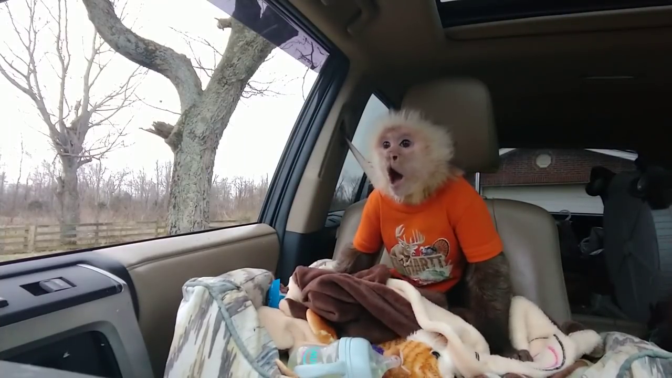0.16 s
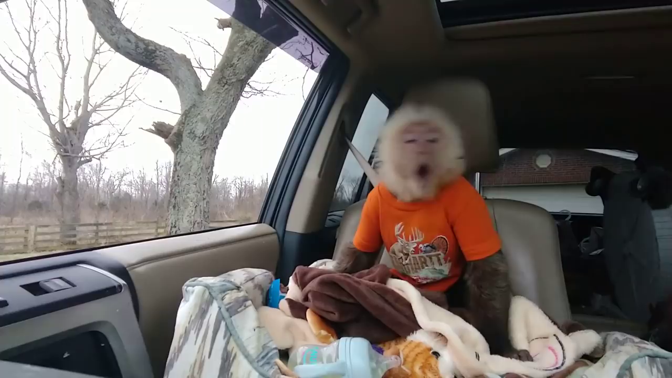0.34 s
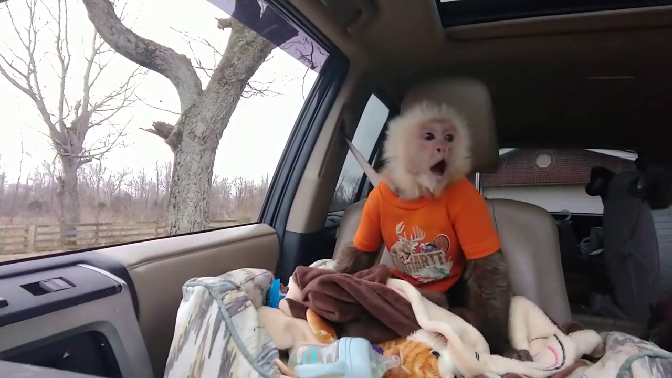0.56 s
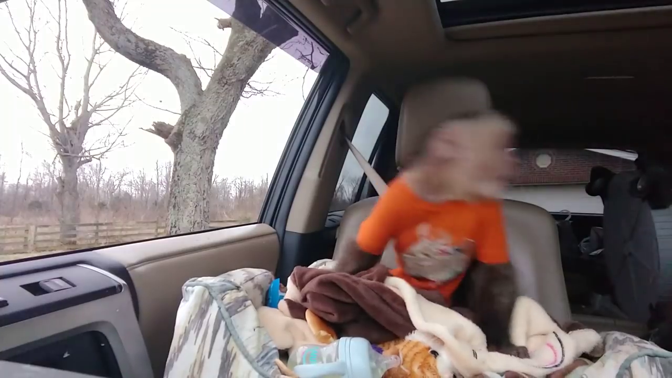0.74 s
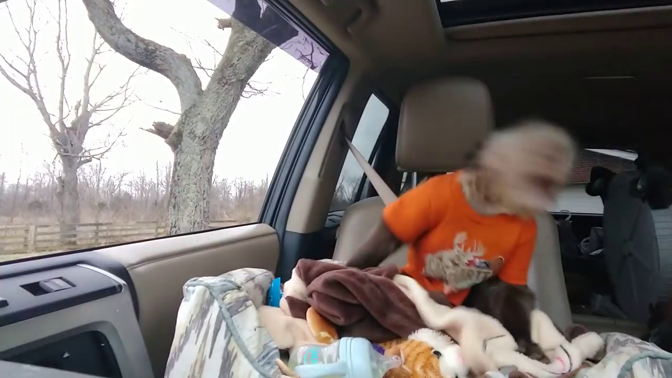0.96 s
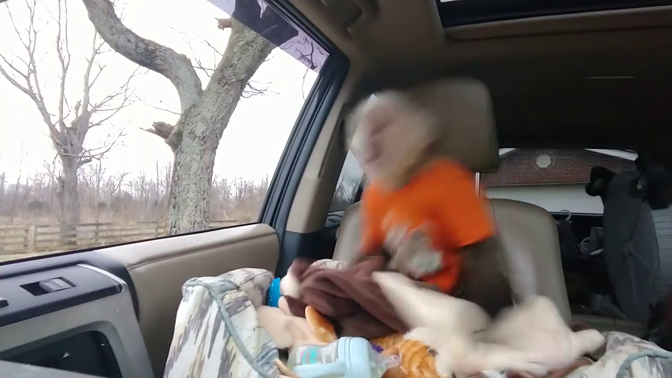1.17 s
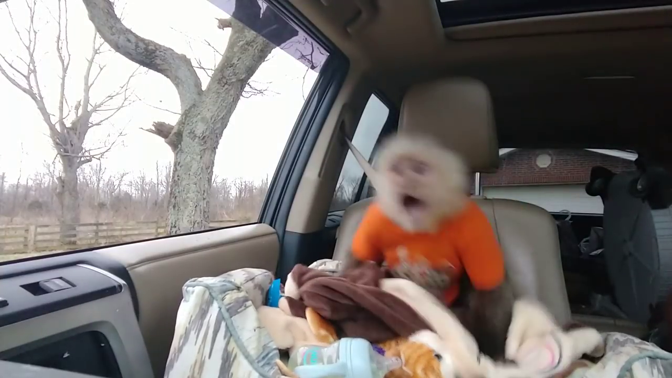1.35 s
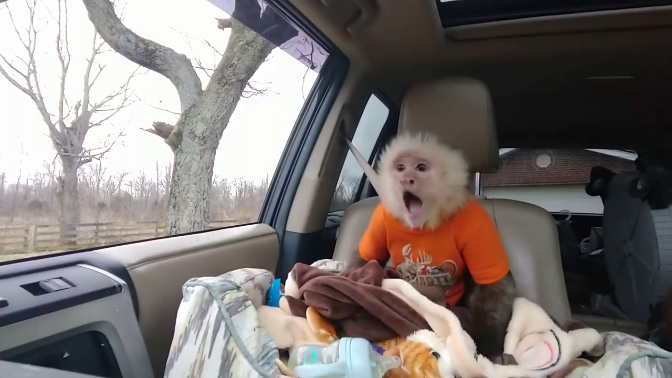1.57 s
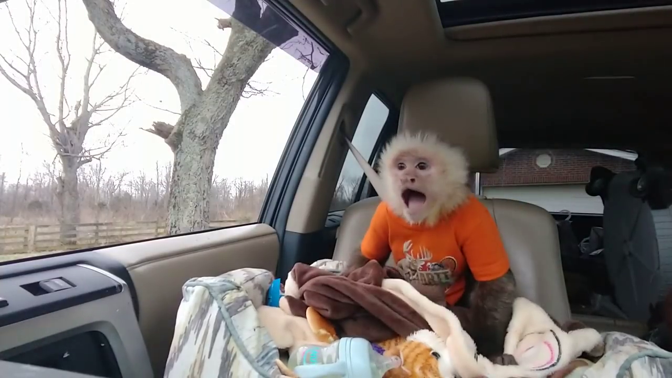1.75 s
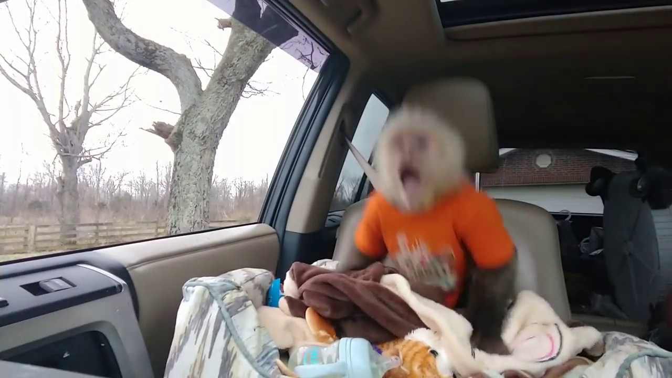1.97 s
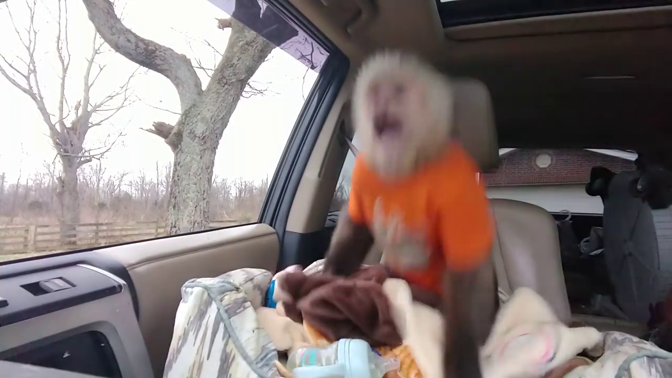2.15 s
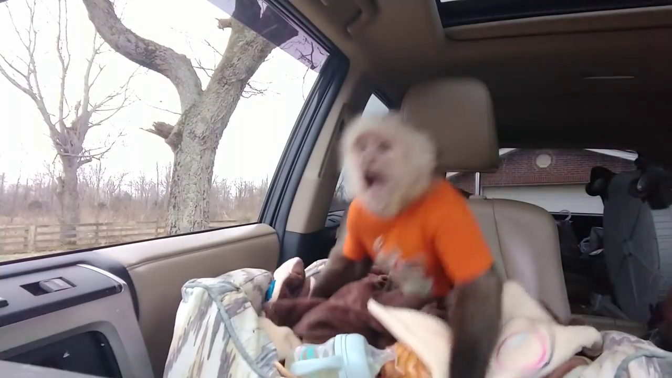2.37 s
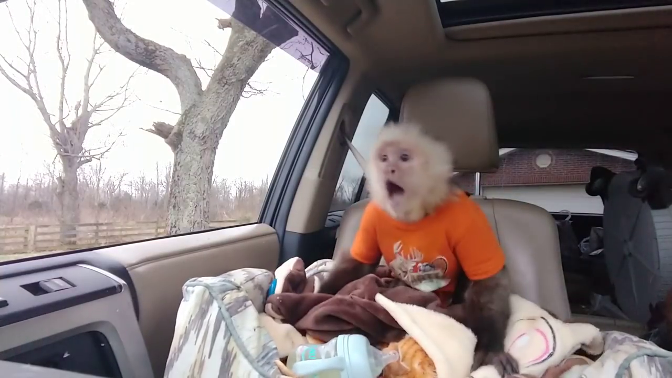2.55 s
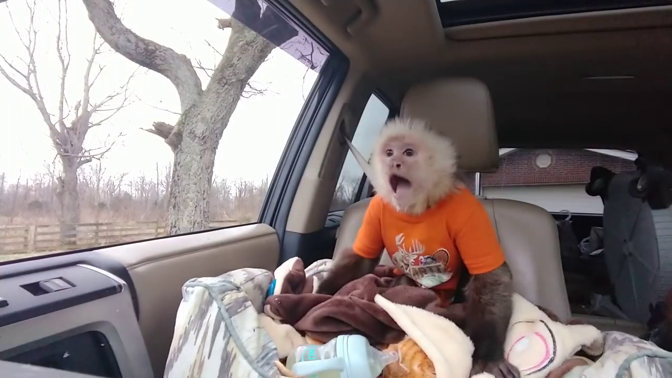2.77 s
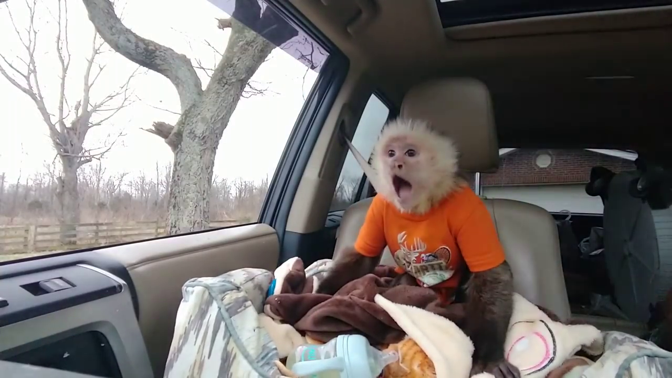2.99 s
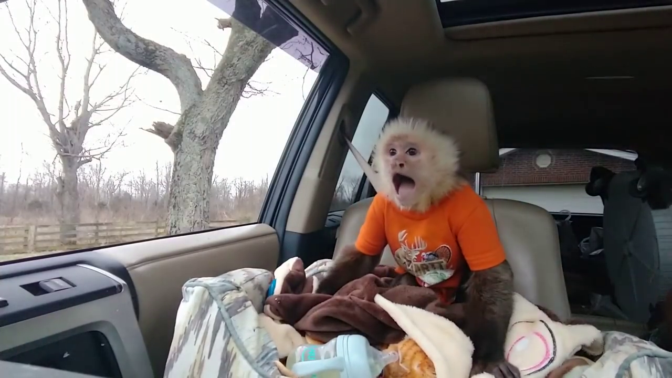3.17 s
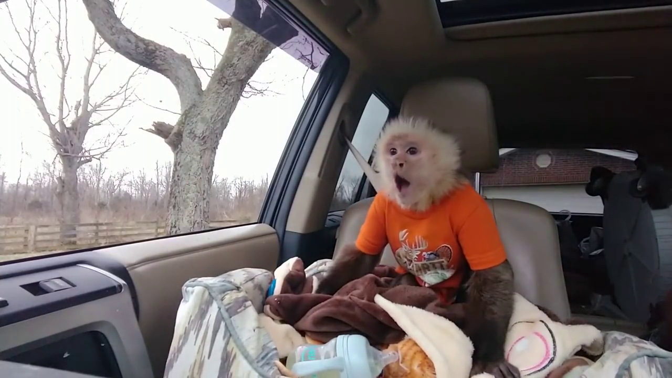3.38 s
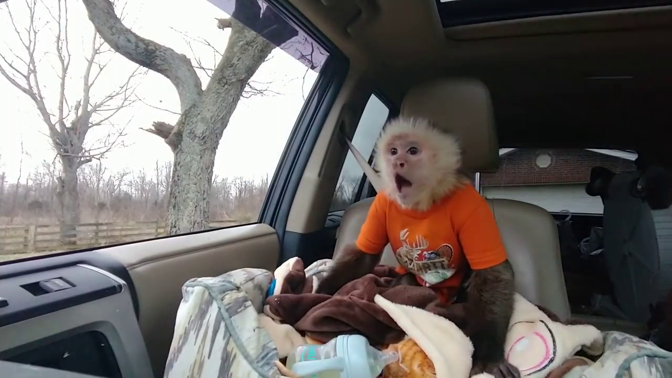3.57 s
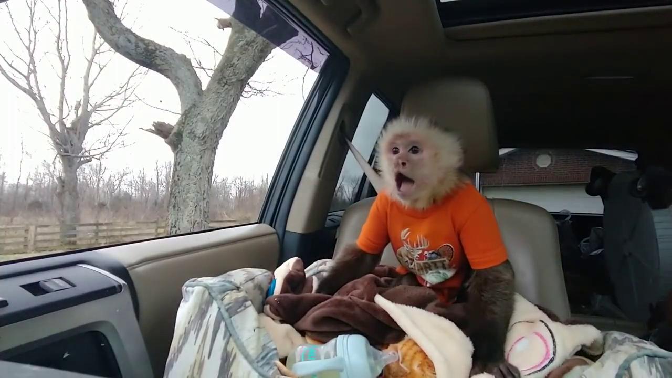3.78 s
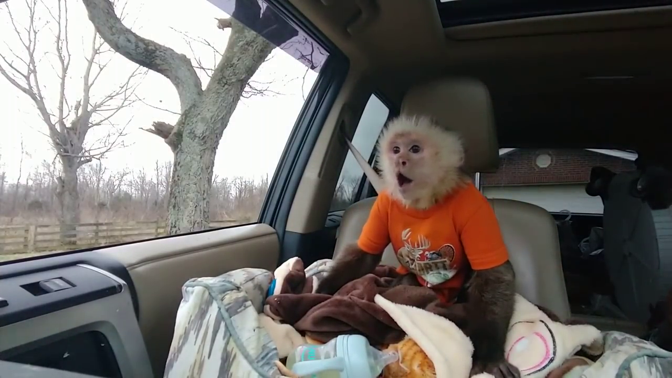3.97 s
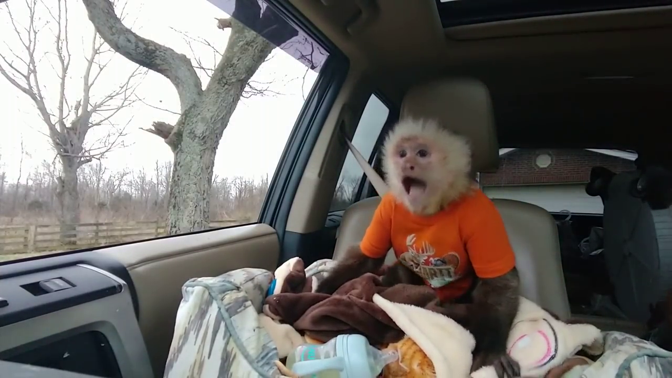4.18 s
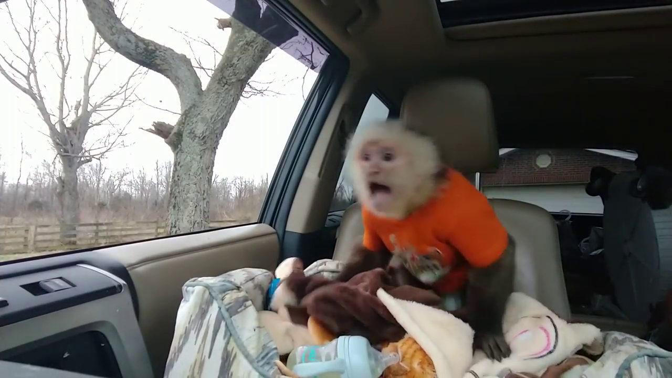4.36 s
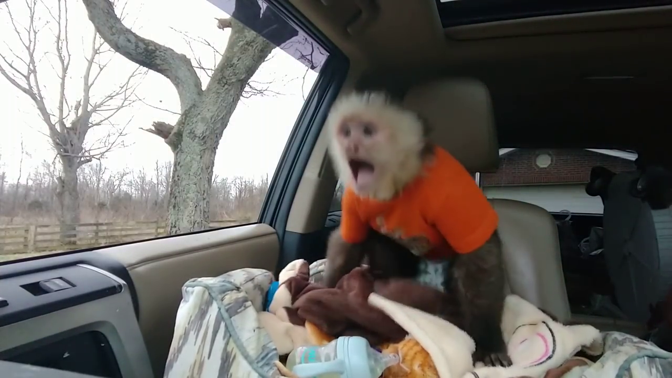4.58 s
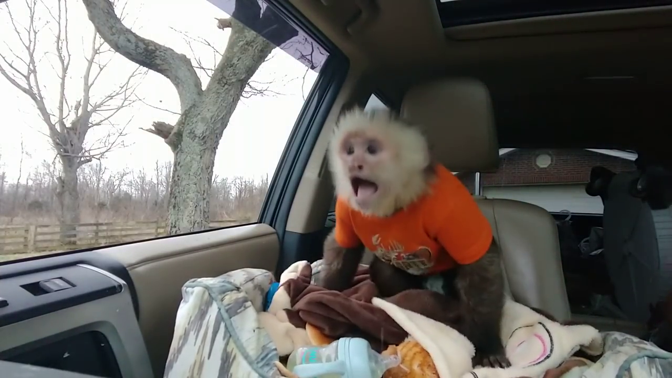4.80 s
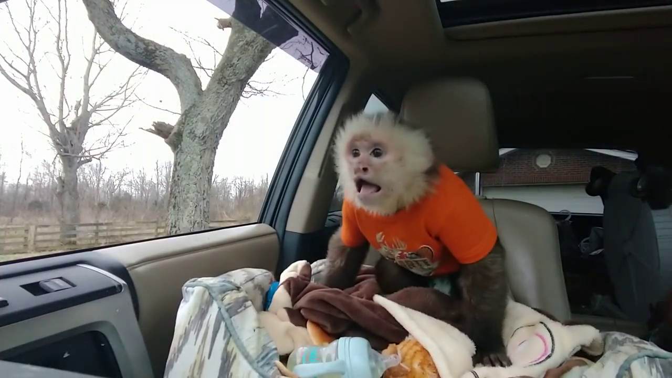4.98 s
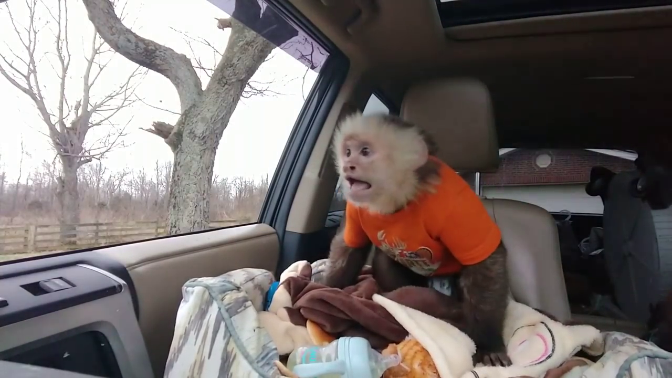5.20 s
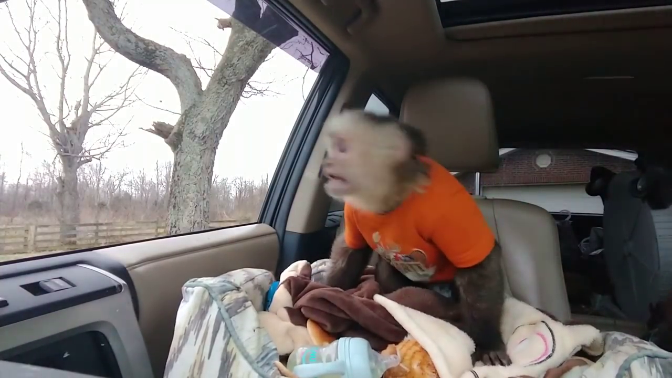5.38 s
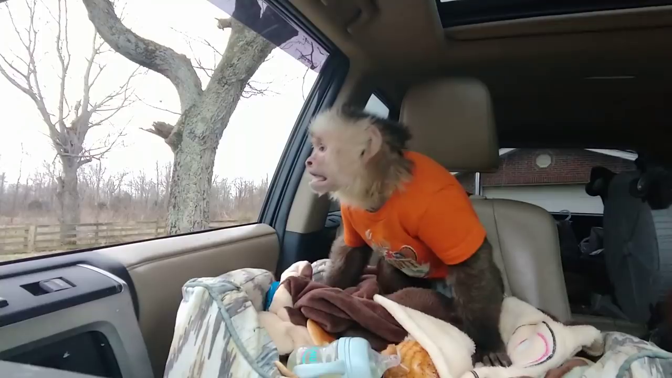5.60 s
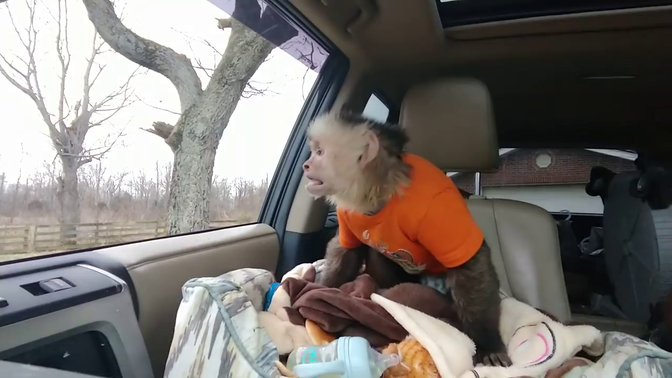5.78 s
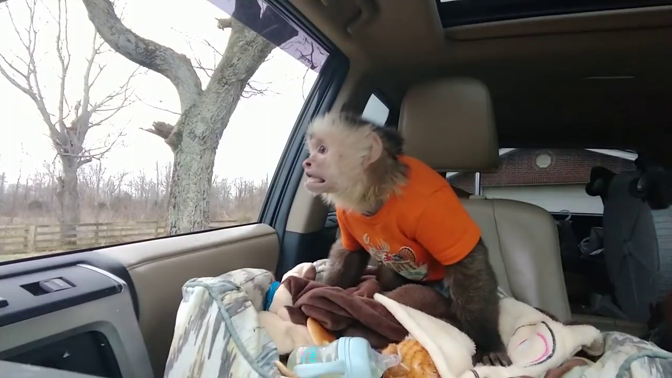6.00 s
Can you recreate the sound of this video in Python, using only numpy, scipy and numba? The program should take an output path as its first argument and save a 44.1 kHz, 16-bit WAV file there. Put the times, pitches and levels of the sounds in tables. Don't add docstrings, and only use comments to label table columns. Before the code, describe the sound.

Inside a dull, upholstered car, a monkey's call is already under way, sinking into a growl. Irregular bursts of raspy barks, short squeaks, low falling hoots and quick pants follow, loud and close in stereo. The last bark comes around four and a half seconds and ends in a growl. Then there is only faint hiss, a growing low rumble outdoors and several faint gliding whines from a far animal.

```python
import sys
import numpy as np
from scipy import signal
from scipy.fft import rfft, irfft
from scipy.io import wavfile
from scipy.ndimage import uniform_filter1d
from numba import njit

SR = 44100
rng = np.random.default_rng(int(sys.argv[2]) if len(sys.argv) > 2 else 0)


def nominal_scale(level):
    x = np.asarray(level, float) / 20
    return 10 ** x


def digitize_waveform(pressure):
    field = np.atleast_2d(pressure).T
    bounded = np.clip(field, -1, 1)
    quanta = np.round(bounded * 32767).astype(np.int16)
    wavfile.write(sys.argv[1], SR, quanta)


N = 266496
TIME = np.arange(N) / SR
OPPOSITE = np.array([[1], [-1]])


def colour(table, hz):
    table_hz, table_db = np.transpose(table)
    return np.interp(np.log(hz + 1), np.log(table_hz + 1), table_db)


def unit(x):
    return x / np.sqrt(np.mean(x ** 2))


def smooth_noise(count, size):
    return unit(uniform_filter1d(rng.standard_normal(count), size))


def wander(rate):
    size = int(SR / rate)
    return unit(uniform_filter1d(smooth_noise(N, size), size))


def fade(t, edge_s):
    return np.clip(t / edge_s, 0, 1) ** 2


def shaped_noise(table, channels):
    spectrum = rfft(rng.standard_normal((channels, N)))
    return unit(irfft(spectrum * nominal_scale(colour(table, np.fft.rfftfreq(N, 1 / SR))), N))


def high_pass(x, order, hz):
    return signal.sosfilt(signal.butter(order, hz, "high", fs=SR, output="sos"), x)


# (time [s], length [s], first pitch [Hz], last pitch [Hz], level [dB])
WHINES = [
    (4.93, .15, 895, 890, -68),
    (5.27, .18, 920, 910, -66),
    (5.3, .12, 1420, 1320, -73),
    (5.64, .16, 1042, 1060, -67),
    (5.79, .2, 1400, 1000, -63),
    (5.9, .16, 1630, 1050, -61),
]


def whines():
    out = 0
    edge_s = .045
    for start, length, first_hz, last_hz, db in WHINES:
        t = TIME - start
        hz = np.interp(t, [0, length], [first_hz, last_hz])
        blur = 1 + 0.44 * smooth_noise(N, 900)
        swell = np.sqrt(fade(t, edge_s) * fade(length - t, edge_s))
        out = out + nominal_scale(db + 3) * swell * blur * np.sin(2 * np.pi * np.cumsum(hz) / SR)
    return out


# (frequency [Hz], share of side [0-1])
PORT_SPREAD = [(300, 0.5), (1000, .42), (3000, 0.72), (8000, .75)]


def ports(x):
    lag_s, steered_above_hz = 0.0004912, 700
    hz = np.fft.rfftfreq(N, 1 / SR)
    aimed = hz ** 2 / (hz ** 2 + steered_above_hz ** 2)
    late = np.exp(-2j * np.pi * hz * lag_s)
    mid = (1 - .72 * aimed * late) / 1.4
    side = -colour(PORT_SPREAD, hz) * aimed * (1 + late) / 1.56
    return irfft(rfft(x) * np.array([mid + side, mid - side]), N)


# (time [s], level [dB])
RUMBLE = [
    (0, -58),
    (2.502, -59.5),
    (4.902, -57.5),
    (5.5, -51.5),
    (6.04, -46.5),
]
# (frequency [Hz], density [dB per Hz])
RUMBLE_COLOUR = [(12, -35.5), (25, -22), (70, -10.5), (235, -2), (460, -14), (1210, -26), (1880, -35.5),
                 (3250, -56.5)]
# (frequency [Hz], density [dB per Hz])
SELF_NOISE = [(880, -33.5), (1500, -7), (2550, -15), (2790, -7), (3030, -12), (8260, -18.5), (15100, -20.5),
              (16500, -9)]


def outdoors():
    mid, side = shaped_noise(RUMBLE_COLOUR, channels=2)
    gain = nominal_scale(np.interp(TIME, *np.transpose(RUMBLE)))
    hiss = nominal_scale(-65.5) * shaped_noise(SELF_NOISE, channels=2) * (gain / gain.min()) ** 0.1
    window = nominal_scale(1.2 * OPPOSITE)
    outside = ports(1.005 * gain * mid + whines()) + 0.4 * gain * side * OPPOSITE
    return window * outside + hiss


def cabin(x, t60_s, wet_db):
    t = np.arange(int(.2 * SR)) / SR
    decay = np.exp(-np.log(1000) * t / t60_s)
    tail = uniform_filter1d(rng.standard_normal(len(t)), size=3) * decay * (t > .002)
    return nominal_scale(wet_db) * signal.fftconvolve(x, tail / np.linalg.norm(tail))[:N]


@njit
def svf(x, hz, width):
    y, band, low = np.empty(len(x)), 0., 0.
    for i in range(len(x)):
        g, k = np.tan(np.pi * hz[i] / SR), width / hz[i]
        v = (band + g * (x[i] - low)) / (1 + g * (g + k))
        band, low, y[i] = 2 * v - band, low + 2 * g * v, k * v
    return y


def ring(x, hz, width):
    hz = hz + np.zeros(N)
    once = svf(x, hz, 1.32 * width)
    return unit(svf(once, hz, 1.32 * width))


def modes(x, table, drift=.025, patchy_db=2.0):
    total = np.zeros(N)
    for k, (hz, width, db) in enumerate(table):
        gain = nominal_scale(db + patchy_db * wander(20))
        total += (-1) ** k * gain * ring(x, hz * (1 + drift * wander(6.8)), width)
    return unit(total)


# (frequency [Hz], width [Hz], level [dB])
MOUTH = [(2472, 200, 1.5), (2357, 2200, -0.5), (3162, 190, 3), (3900, 200, -9)]
HISS = [(5390, 1047, -2.1), (7290, 1460, -4)]
TEETH = [(8380, 570, -6), (9440, 1100, -8), (14600, 830, -17)]
# (start [s], end [s], level [dB], swell [dB])
PANTS = [
    (.2, 0.324, -68.5, -16),
    (0.681, 0.813, -64, 1),
    (1.542, 1.617, -51, 15.5),
    (1.885, 1.961, -53.5, 10),
    (2.232, 2.363, -57, 13.5),
    (2.507, 2.532, -67, 39),
    (2.922, 2.979, -52.5, 2),
    (3.26, 3.392, -58, -9),
    (3.57, 3.683, -74.5, -4),
    (4.8, 4.915, -70.5, -6),
]


def pants():
    air = rng.standard_normal(N)
    tract = nominal_scale(1.5) * ring(air, 1450, 500.) + modes(air, MOUTH)
    tract += nominal_scale(-1.5) * modes(air, HISS) + nominal_scale(-5.5) * modes(air, TEETH)
    gain = np.zeros(N)
    edge_s = 0.0089
    for start, end, db, swell_db in PANTS:
        progress = np.clip((TIME - start) / (end - start), 0, 1)
        edges = fade(TIME - start, edge_s) * fade(end - TIME, edge_s)
        gain += edges * nominal_scale(db + swell_db * (progress - .5))
    return tract * gain


def glides(table, overtone, attack_s, tilt_db, wobble, grow_db, count, arch=0):
    out = np.zeros(N)
    for start, length, first_hz, last_hz, db in table:
        u = np.arange(int(length * SR)) / (length * SR)
        hz = first_hz + (last_hz - first_hz) * u
        hz += arch * (first_hz + last_hz) * 2 * u * (1 - u)
        hz = hz * (1 + wobble * u * smooth_noise(4000, 60)[:len(u)])
        phase = 2 * np.pi * np.cumsum(hz) / SR
        tone = 0
        for k in range(1, count + 1):
            tone = tone + nominal_scale(colour(overtone, k * hz) - tilt_db * (k - 2.5)) * np.cos(k * phase)
        swell = np.minimum(u * length / attack_s, 1) ** 0.81 * np.minimum((1 - u) / 0.25, 1)
        swell = swell * nominal_scale(grow_db * (u - .5))
        first = int(start * SR)
        out[first:first + len(u)] += nominal_scale(db) * swell * tone
    return out


# (time [s], length [s], first pitch [Hz], last pitch [Hz], level [dB])
HOOTS = [(.105, .05, 520, 390, -38), (.385, .052, 500, 405, -44), (.555, .07, 505, 410, -38),
         (.872, .04, 560, 350, -39), (1.15, .048, 515, 255, -38), (1.275, .055, 450, 480, -43),
         (1.705, .035, 610, 430, -43), (2.035, .03, 525, 565, -44), (2.432, .035, 330, 240, -37),
         (3.465, .05, 345, 245, -39), (3.745, .06, 288, 208, -38), (4.145, .04, 370, 210, -41),
         (4.318, .04, 293, 293, -44), (4.465, .035, 490, 190, -42)]
# (frequency [Hz], level [dB])
HOOT_COLOUR = [(200, 0), (600, -2), (750, -18), (1100, -4)]


def hoots():
    return glides(HOOTS, HOOT_COLOUR, attack_s=.012, tilt_db=3, wobble=.06, grow_db=-4, count=5)


# (time [s], length [s], first pitch [Hz], last pitch [Hz], level [dB])
SQUEAKS = [(.329, 0.0099, 2110, 3070, -14.5), (.336, 0.015, 2850, 2854, -15),
           (.820, 0.0074, 2047, 2860, -21.5), (.826, 0.013, 2604, 2770, -18),
           (1.104, 0.0062, 2483, 2900, -15.5), (1.635, .011, 2143, 3097, -14),
           (1.968, 0.0079, 1950, 3280, -14), (2.369, 0.017, 1400, 3005, -16),
           (2.672, 0.013, 2840, 2671, -16.5), (2.988, .013, 2647, 3723, -14),
           (3.410, .018, 2577, 2409, -15), (3.695, .018, 2786, 2492, -14.5),
           (4.114, 0.0096, 2105, 2140, -23.5)]
# (time [s], length [s], first pitch [Hz], last pitch [Hz], level [dB])
CHIRPS = [(1.096, 0.0094, 1583, 2120, -26.5), (1.231, 0.0033, 1055, 1470, -19),
          (2.547, 0.0088, 1632, 1866, -24), (2.618, 0.014, 1106, 869, -37.5),
          (2.632, 0.011, 1392, 1490, -28), (4.124, 0.031, 1730, 1068, -20), (4.273, 0.015, 1292, 1722, -17),
          (4.291, 0.018, 1350, 956, -34), (4.422, 0.029, 1282, 847, -30), (4.444, .030, 1413, 1223, -27),
          (4.544, 0.0074, 1378, 1380, -22.5)]
# (frequency [Hz], level [dB])
OVERTONE = [(800, -6), (1500, -10.5), (3000, -6.5), (5500, -3.5), (8000, 1), (11000, -18.5), (15000, -39.5)]


def squeaks():
    high = glides(SQUEAKS, OVERTONE, attack_s=0.0026, tilt_db=5, wobble=.03, grow_db=5, count=6, arch=.07)
    low = glides(CHIRPS, OVERTONE, attack_s=.0026, tilt_db=7, wobble=.02, grow_db=3, count=6)
    return high + low


@njit
def beats(hz, stretch, size):
    pulses, phase, k = np.zeros(len(hz)), 0., 0
    for i in range(len(hz)):
        phase += hz[i] * stretch[k] / SR
        if phase >= 1:
            phase, k = phase - 1, k + 1
            pulses[i] = size[k]
    return pulses


# (start [s], end [s], flaps [Hz], depth [0-1])
GROWLS = [
    (.03, .17, 95, .5),
    (.52, .65, 95, .55),
    (1.33, 1.53, 90, .65),
    (1.71, 1.8, 85, .75),
    (2.05, 2.14, 95, .65),
    (2.7, 2.9, 92, .75),
    (3.07, 3.17, 95, .5),
    (4.56, 4.76, 118, .65),
]


def folds(chaos_hz, jitter, scatter_db, air_db):
    chance = rng.standard_normal((N // 10, 4)).T
    fast = beats(np.full(N, 1. * chaos_hz), np.exp(jitter * chance[0]), nominal_scale(scatter_db * chance[1]))
    fast = unit(fast - fast.mean()) + nominal_scale(air_db) * rng.standard_normal(N)
    flap_hz, depth = np.full(N, 90.), np.zeros(N)
    for start, end, hz, share in GROWLS:
        inside = (TIME > start) & (TIME < end)
        flap_hz[inside], depth[inside] = hz, share
    depth = uniform_filter1d(depth, size=600)
    flaps = beats(flap_hz, np.exp(.14 * chance[2]), nominal_scale(1.5 * chance[3]))
    puff = unit(np.convolve(flaps, np.hanning(230))[:N])
    snap = unit(np.convolve(flaps, np.hanning(12))[:N])
    gate = 1 - depth + depth * puff
    return unit(fast) * gate, depth * snap, gate


# (time [s], length [s], level [dB], mouth opening [dB], throat resonance [Hz])
BARKS = [(-.02, 0.15, -24.5, -2.5, 1382), (0.328, 0.12, -20, 1, 1386), (0.826, 0.12, -19, -1, 1270),
         (1.105, 0.11, -21, 7, 1276), (1.231, 0.15, -25, 9.5, 1427), (1.64, 0.1, -23.5, 8, 1306),
         (1.968, 0.12, -20, 6, 1346), (2.377, .11, -19, 3, 1290), (2.556, 0.056, -20, 7.5, 1256),
         (2.616, 0.058, -36, 7, 1430), (2.673, 0.23, -24.5, 4, 1392), (2.995, 0.063, -20, 12.5, 1422),
         (3.422, .11, -23.5, 3.5, 1364), (3.707, 0.11, -21, 0.5, 1318), (4.12, 0.088, -24.5, 2, 1300),
         (4.277, 0.081, -28, 10.5, 1300), (4.426, 0.1, -37.5, 13.5, 1260), (4.551, 0.12, -25, 10, 1350)]


def bark(start, length, db, open_db, throat_hz):
    t = TIME - start
    u = np.clip(t / length, 0, 3)
    cut_db = 17 * u ** 4
    push = fade(t, 0.0086) * nominal_scale(db - 4 * fade(t - 0.035, .014))
    throat = fade(t, 0.015) * nominal_scale(-43.5 * u ** 2.14)
    mouth = nominal_scale(open_db - 33.7 * u ** 0.99 - cut_db)
    hiss = nominal_scale(open_db - 8 - 26.5 * u - cut_db)
    chest = nominal_scale(-18 - 112 * (u - 0.35) ** 2)
    return push * np.array([throat, mouth, hiss, chest])


# (start [s], end [s], level [dB], swell over the hold [dB], mouth opening [dB])
HOLDS = [
    (0.038, 0.14, -23, -13, -13.5),
    (0.512, 0.629, -26, -9, -13.5),
    (1.297, 1.37, -28, 3.5, -12),
    (1.377, 1.51, -21.5, -5.5, -5.5),
    (1.687, 1.82, -26, 9, -11.5),
    (2.043, 2.15, -23, -3, -8),
    (2.722, 2.873, -22.5, 2, -8.5),
    (3.029, 3.16, -27, 6, -6),
    (4.587, 4.739, -24.5, -0.5, 0.5),
]


def hold(start, end, db, swell_db, open_db):
    u = np.clip((TIME - start) / (end - start), 0, 1) - .5
    release_db = 1492 * np.maximum(TIME - end, 0)
    effort = fade(TIME - start, 0.023) * nominal_scale(db + swell_db * u - release_db)
    flat = np.zeros(N)
    chest_db = -17.5 + .7 * open_db
    return effort * nominal_scale(np.array([flat, open_db + 4.5 * u, flat - 19.5, flat + chest_db]))


# (peak time [s], rise [s], fall [s], level [dB], mouth opening [dB])
SURGES = [
    (0.087, 0.047, 0.032, -25, -1),
    (0.469, 0.025, .07, -21.5, -8),
    (1.361, 0.038, .06, -24, 9),
    (1.835, 0.051, 0.024, -26.5, 4),
    (2.171, 0.044, 0.044, -25.5, 4),
    (3.193, 0.044, 0.041, -23, 3),
]


def surge(peak, rise_s, fall_s, db, open_db):
    t = TIME - peak
    early, late = np.clip(-t / rise_s, 0, 1), np.clip(t / fall_s, 0, 3)
    effort = fade(t + rise_s, rise_s / 2) * nominal_scale(db - 49.5 * late ** 2)
    flat = np.zeros(N)
    return effort * nominal_scale(np.array([flat, open_db + 3.5 * early, -6.5 - 31 * early, flat - 17]))


def breath():
    barks = np.array([bark(*row) for row in BARKS]) ** 2
    held = sum(hold(*row) ** 2 for row in HOLDS) + sum(surge(*row) ** 2 for row in SURGES) + 1e-12
    power = barks.sum(axis=0) + held
    bark_throat_hz = np.array(BARKS)[:, -1]
    throat_hz = (bark_throat_hz @ barks[:, 0] + 1350 * held[0]) / power[0]
    broad = nominal_scale(-1 - 9 * held[0] / power[0])
    return np.sqrt(power), throat_hz, broad


# (start [s], end [s])
GASPS = [
    (.065, .12),
    (1.79, 1.87),
    (2.13, 2.21),
    (3.17, 3.24),
    (4.42, 4.52),
]


def teeth_open():
    gasping = sum((TIME > start) & (TIME < end) for start, end in GASPS)
    return nominal_scale(-5 - 13 * uniform_filter1d(1. * gasping, size=500))


# (frequency [Hz], width [Hz], level [dB])
THROAT = [(1040, 180, -7), (1750, 300, -8)]
CHEST = [(240, 300, -2), (440, 170, 2.5)]


def rasp():
    (throat_gain, mouth_gain, hiss_gain, chest_gain), throat_hz, broad = breath()
    burst, snap, gate = folds(chaos_hz=650, jitter=.45, scatter_db=3, air_db=0)
    source = burst + .2 * snap
    throat = unit(ring(source, throat_hz, 240.) + broad * modes(source, THROAT))
    throat = high_pass(throat, 6, 860)
    air = burst / np.sqrt(gate) + 0.27 * rng.standard_normal(N)
    hiss = modes(air, HISS) + teeth_open() * modes(air, TEETH, patchy_db=5.0)
    mouth = modes(burst / gate ** 0.71, MOUTH)
    chest = modes(burst + 1.6 * snap, CHEST)
    return throat_gain * throat + mouth_gain * mouth + hiss_gain * hiss + chest_gain * chest


def scene():
    monkey = rasp() + squeaks() + hoots() + pants()
    monkey = high_pass(monkey, 2, 170)
    front = cabin(monkey, t60_s=.06, wet_db=-12)
    flank = cabin(monkey, t60_s=.05, wet_db=-15.5)
    lean = nominal_scale(-.05 * OPPOSITE)
    return lean * (ports(monkey + front) + flank * OPPOSITE) + outdoors()


def roll_off(x):
    return signal.sosfilt(signal.butter(12, 16100, fs=SR, output="sos"), x)


def record(dry):
    rounded = np.tanh(.45 * dry) / .45
    return roll_off(rounded)


dry = scene()
out = record(dry)
digitize_waveform(out)
```